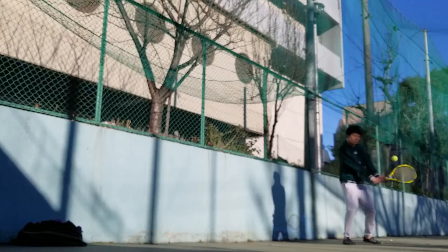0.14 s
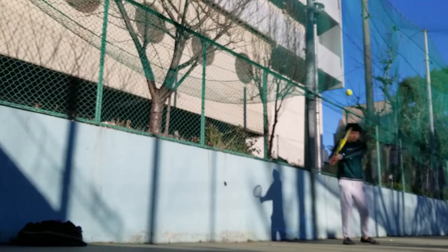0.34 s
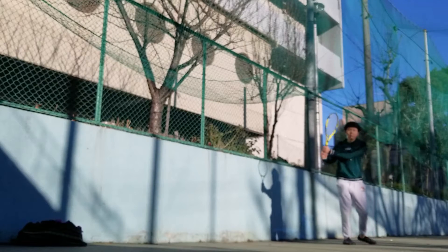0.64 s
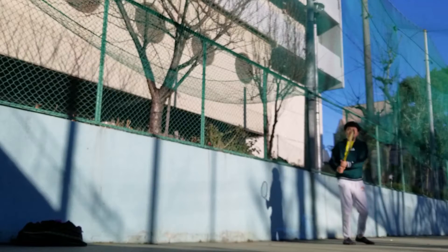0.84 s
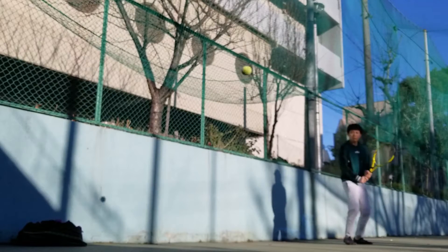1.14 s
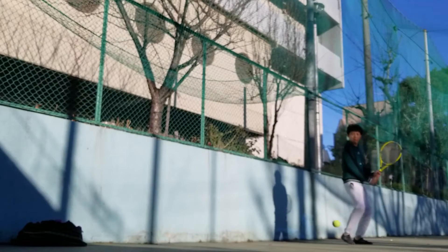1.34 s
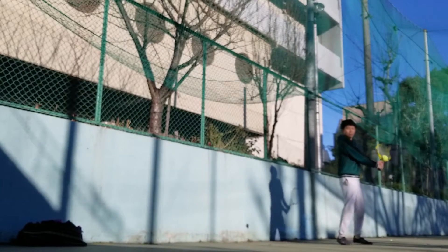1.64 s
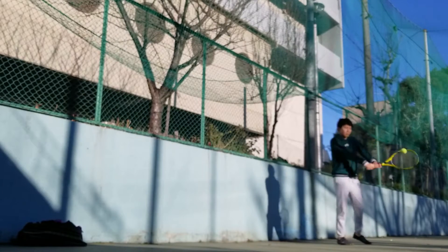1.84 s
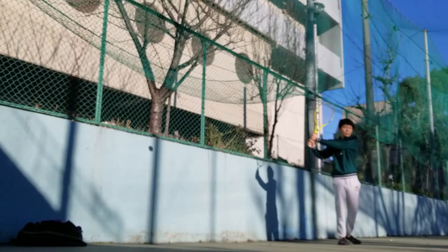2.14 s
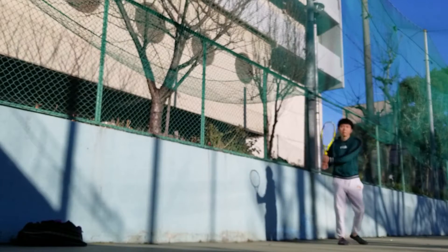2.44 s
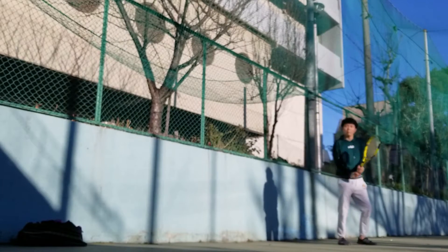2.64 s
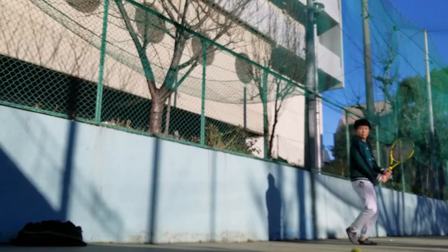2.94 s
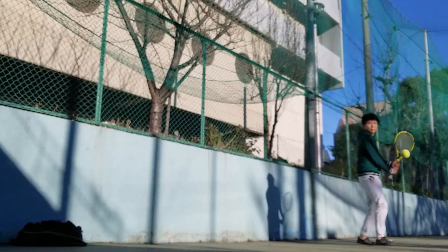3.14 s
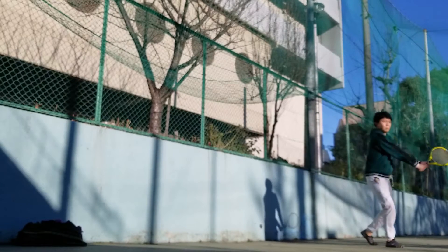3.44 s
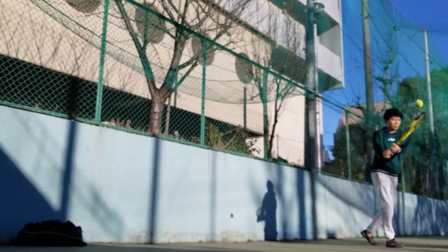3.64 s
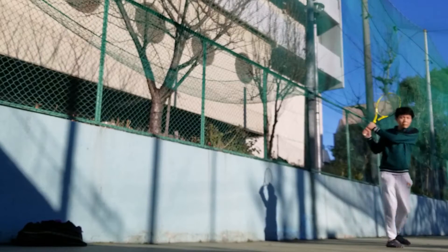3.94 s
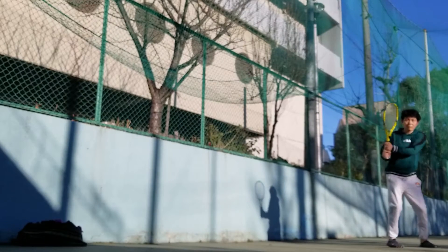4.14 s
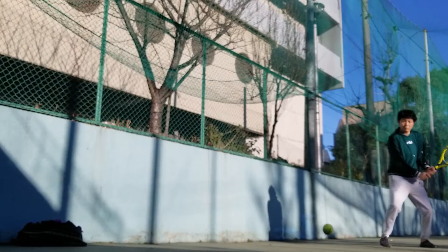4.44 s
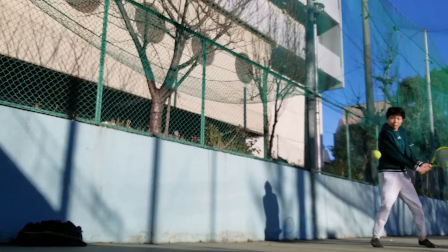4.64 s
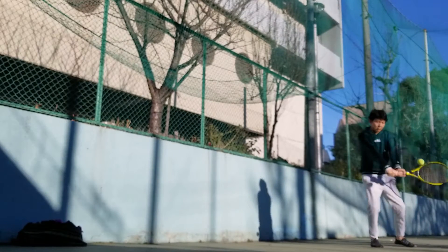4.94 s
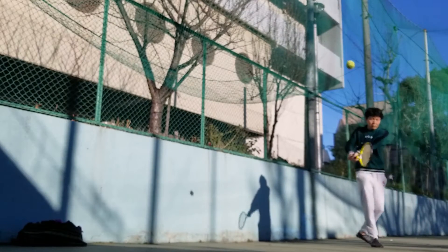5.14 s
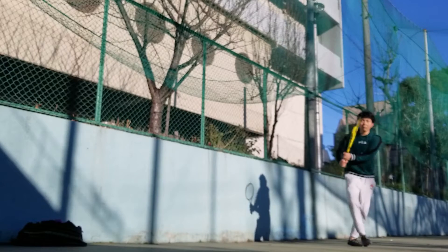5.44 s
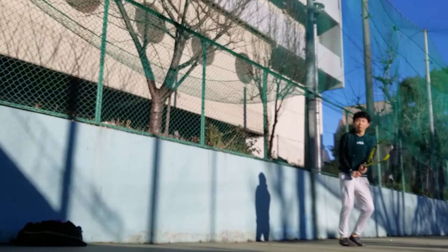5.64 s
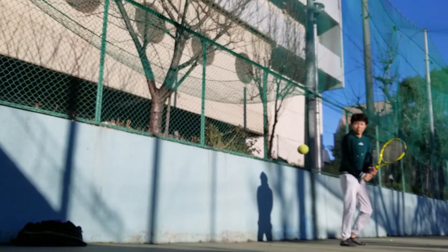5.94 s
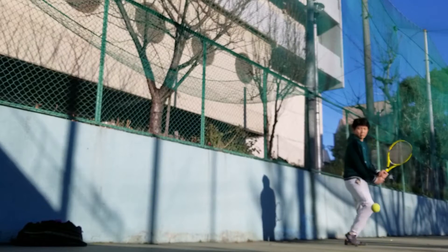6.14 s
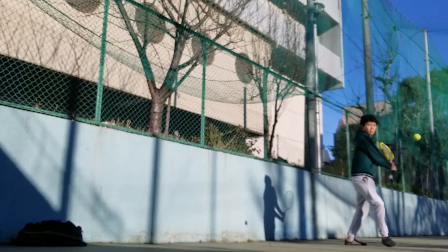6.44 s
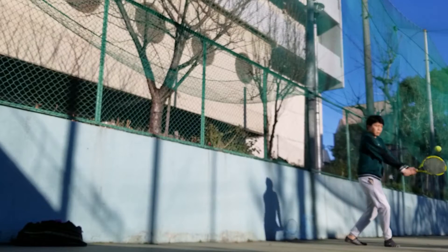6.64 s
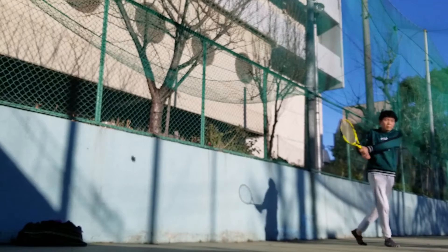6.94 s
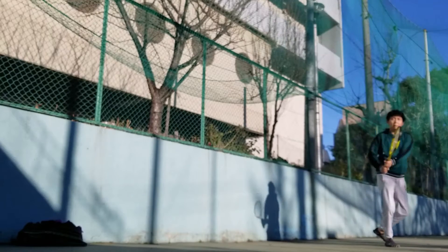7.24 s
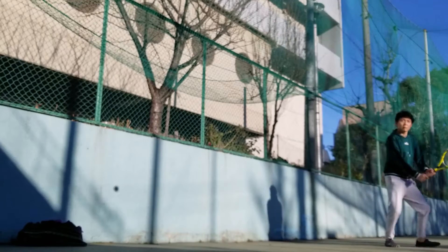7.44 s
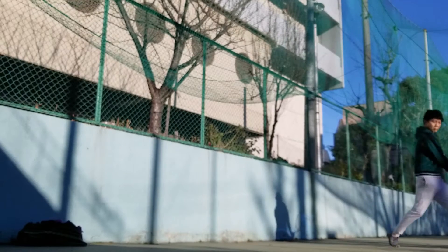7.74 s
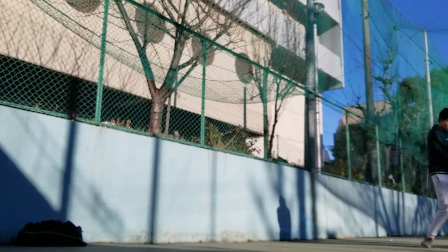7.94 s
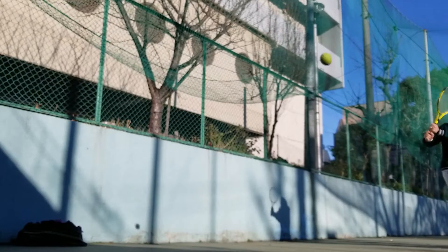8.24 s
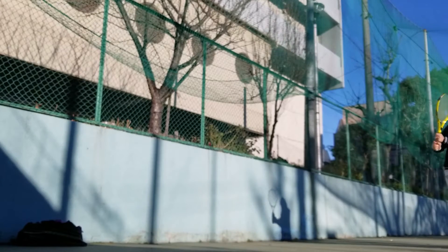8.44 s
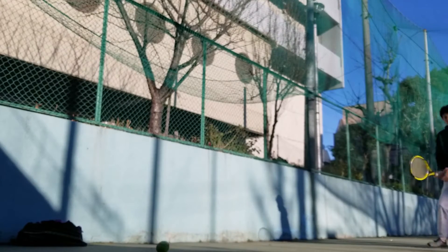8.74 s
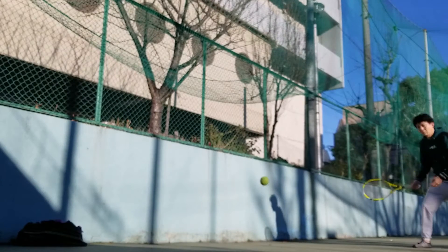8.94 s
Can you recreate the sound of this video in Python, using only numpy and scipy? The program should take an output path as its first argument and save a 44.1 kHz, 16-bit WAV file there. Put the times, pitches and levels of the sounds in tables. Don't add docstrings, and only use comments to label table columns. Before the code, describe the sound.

Outdoor wall practice: soft racket thwocks, loud cracking wall hits with short echoes, lighter court bounces, and shoe scuffs above a low town hum.

```python
import sys
import numpy as np
from scipy import signal
from scipy.fft import rfft, irfft, next_fast_len
from scipy.io import wavfile
from scipy.ndimage import uniform_filter1d

SR = 44100
rng = np.random.default_rng(int(sys.argv[2]) if len(sys.argv) > 2 else 0)


def digitize_waveform(pressure):
    field = np.atleast_2d(pressure).T
    bounded = np.clip(field, -1, 1)
    quanta = np.round(bounded * 32767).astype(np.int16)
    wavfile.write(sys.argv[1], SR, quanta)


def volts_from_db(level):
    exponent = np.asarray(level, float) / 20
    return 10 ** exponent


N = 399987
SPAN = 2 ** 15
T = np.arange(SPAN) / SR
HZ = np.fft.rfftfreq(SPAN, 1 / SR)

# t/s, level/dB
TRAFFIC = [(0.0, -46.5), (0.96, -42), (1.03, -44), (1.51, -44), (2.19, -46), (2.4, -44.5), (3.69, -46.5),
           (3.99, -43), (4.24, -46.5), (4.55, -45.5), (4.75, -49), (5.73, -46.5), (5.88, -46), (7.2, -45),
           (7.78, -45), (8.31, -43), (8.92, -45.5), (9.07, -43.5)]
# f/Hz, level/dB
RUMBLE = [(15, -70), (25, -33), (36, -17), (54, 4), (81, 0.5), (107, -0.5), (140, -18.5), (180, -43.5)]
HUM = [(82, -16), (140, 0), (205, -4), (269, -4), (603, -11), (750, -16.5), (980, -53.5), (1650, -120)]
TYRE_HISS = [(440, -41.5), (750, 12.5), (1400, 10.5), (2000, -2), (2650, -5.5), (3000, -23), (3800, -18.5),
             (5000, -61)]
# f/Hz, likeness (-1 to 1)
LIKENESS = [(60, 1), (130, 0.93), (290, 0.91), (640, 0.13), (1410, -0.44), (3100, 0.08), (15000, 0.027)]

# t/s, half length/ms, scuff level/dB, sizzle level/dB
DRAGS = [(.37, 69, -61, -66), (.55, 150, -78.5, -85), (.91, 84, -66, -79), (1.93, 65, -60.5, -66),
         (2.37, 90, -61.5, -62.5), (2.529, 51, -54.5, -60), (2.66, 61, -59.5, -82), (3.0, 23, -70, -77),
         (3.262, 13, -57.5, -79), (3.36, 65, -76, -99), (3.6, 24, -63, -70), (3.72, 77, -71.5, -102),
         (4.086, 23, -49.5, -52.5), (4.19, 77, -63, -84), (4.92, 35, -77, -81), (5.02, 13, -76, -76),
         (5.2, 60, -76, -100), (5.602, 22, -52.5, -62), (5.71, 37, -69, -91), (6.76, 27, -83, -80),
         (6.89, 24, -68, -98), (7.22, 30, -58.5, -65), (7.33, 42, -68, -98), (7.92, 64, -57.5, -59),
         (8.04, 15, -68, -72), (8.17, 56, -67.5, -98), (8.52, 30, -59.5, -72), (8.65, 59, -65, -86),
         (8.84, 28, -70, -75.5)]
# t/s, half length/ms, level/dB
RUSTLES = [(1.84, 22, -70), (2.88, 21, -81), (4.72, 30, -86.5), (4.88, 60, -76.5), (5.2, 50, -85),
           (5.95, 35, -84), (6.2, 15, -85), (6.57, 32, -82.5), (7.55, 29, -77), (7.65, 20, -82),
           (7.72, 15, -86), (8.95, 45, -86)]
STILL_DB = (-83, -101, -85)
# f/Hz, level/dB
SCUFF = [(1500, -35.5), (2500, -8), (4000, -11.5), (6000, -15.5), (8000, -23.5), (9500, -44)]
CLOTH = [(5500, -25.5), (6500, 7.5), (7300, 14), (8100, 11), (8900, -45)]
SIZZLE = [(8000, -12), (9500, -14.5), (11500, -6.5), (13700, -6), (15600, -7), (16000, -30)]
# t/s,
# level/dB, f/Hz, time to fall 60 dB/s
SHORT_TICKS = [(0.0594, -61, 1570, 0.01), (3.2565, -54, 4710, 0.014), (3.879, -45, 1600, 0.0091),
               (5.4086, -75, 1620, 0.012), (6.18, -55, 6600, 0.014), (6.4994, -73, 1520, 0.0073),
               (6.539, -61, 1680, 0.0075), (7.3178, -38.5, 2330, 0.009), (7.4994, -48, 1630, 0.01),
               (7.6194, -42, 1500, 0.01), (8.2594, -63, 1490, 0.01), (8.4494, -64, 1850, 0.012),
               (8.5694, -48, 2580, 0.0083), (8.6413, -51, 1660, 0.01), (8.6489, -32.5, 2350, 0.0091),
               (8.7326, -51, 1640, 0.0068), (8.8094, -50, 2080, 0.01), (8.844, -36.5, 1950, 0.017)]

# t/s, thump level/dB, string clack level/dB
STROKES = [
    (0.2215, -26.5, -33.5),
    (1.8798, -23, -39.5),
    (3.557, -21, -35),
    (4.9914, -34, -46),
    (6.7128, -23.5, -39.5),
    (8.0103, -25, -38),
]
# ring level/dB, then level/dB of four modes, lowest first
LANDINGS = [
    (-38.5, -8, 1, -5, -26),
    (-37, -23, -8, -26, -4),
    (-36, -4, -1, -26, 0),
    (-43, -6, -14, -24, -9),
    (-32.5, -20, -3, -28, -12),
    (-39.5, 0, -16, -18, -2),
]
# f/Hz, level/dB, time to fall 60 dB/s
CLACK_MODES = [(1089, 7.5, 0.038), (1213, -11, 0.042), (1314, -1.5, 0.12), (1427, 2, 0.06),
               (2290, -22, 0.36), (2480, -7, 0.091), (2760, -45.5, 0.54)]
# f/Hz, level/dB, time to fall 60 dB/s
STEADY_MODES = [(872, 0, .24), (1620, -17, .36)]
# f/Hz, time to fall 60 dB/s
PLACED_MODES = [(566, .42), (1455, .14), (1852, .3), (1989, .23)]
# f/Hz, level/dB
FELT = [(880, 2), (1500, -2.5), (2540, -12.5), (2970, -23.5), (4160, -19.5), (4690, -16.5), (7840, -21),
        (16000, -29)]

# t/s, left leads/ms, wall echo/ms, fence echo/ms
BOUNCE_PATHS = [(1.3796, -.16, 3.52, 11.1), (2.9427, -.16, 3.54, 14.4), (4.4036, -.11, 3.47, 14.5),
                (6.0719, -.18, 3.59, 13.1), (7.7984, -.29, 3.75, 14.5), (8.7529, .02, 2.95, 13.6)]
# crack level/dB, thump level/dB, ball air level/dB, fence echo level/dB
BOUNCE_LEVELS = [
    (-17.5, -30, -34.5, -8),
    (-15, -29, -37.5, -6),
    (-21, -30, -39.5, -3.5),
    (-22, -29.5, -39, -5),
    (-18, -30, -38, -7.5),
    (-20.5, -28.5, -39, -8.5),
]
# t/s, left leads/ms, fence echo/ms, far house front echo/ms
WALL_PATHS = [(.7842, .34, 14.3, 191), (2.4642, .34, 15.2, 192), (4.0261, .39, 16.2, 196),
              (5.5319, .34, 15.2, 193), (7.162, .2, 17.6, 193), (8.4803, .48, 16.1, 203)]
# crack, thump, ball air, grit and fence echo, each level/dB
WALL_LEVELS = [
    (-5, -7.5, -19.5, -31.5, -14),
    (-4, -8.5, -19.5, -16, -12),
    (-1, -4, -18, -21, -12),
    (-7, -9.5, -20, -36, -12),
    (-2, -4, -19, -21, -15),
    (1.5, -4.5, -20.5, -30, -9.5),
]
# f/Hz, level/dB, time to fall 60 dB/s
POST_MODES = [(4050, -10, .16), (4115, -5, .2), (4160, 0, .24), (4205, -5, .14), (6640, -12, .05),
              (8790, -16, .04)]

# echo after a wall hit/ms, echo after a court sound/ms, level/dB
BUILDINGS = [(72.4, 70.5, -21), (91, 80.5, -28), (97.5, 106, -24), (115, 122, -30), (145, 87, -33),
             (160, 152, -30), (171, 168, -30)]
# f/Hz, time to fall 60 dB/s
TAIL_DECAY = [(150, 1), (600, 0.094), (2000, 1), (3300, 0.71), (5000, 0.24), (12000, 0.19)]
# f/Hz, level/dB
TAIL_COLOUR = [(100, -16), (400, 6.5), (1500, -4), (4000, 2.5), (8000, 6.5), (16000, -30)]
# f/Hz, level/dB
BALANCE_DB = [(60, -0.5), (250, -2), (1000, -3), (2500, -4), (8000, -4), (14000, -2)]


def unit(x):
    return x / np.sqrt(np.mean(x ** 2) + 1e-20)


def along(points, hz):
    f, v = np.transpose(points)
    return np.interp(np.log(hz + 1), np.log(f + 1), v)


def curves(rows):
    s, *cols = np.transpose(rows)
    return [np.interp(np.arange(N) / SR, s, c) for c in cols]


def swells(rows, shape):
    t = np.arange(N) / SR
    return sum(volts_from_db(db) * np.exp(-np.abs((t - s) * 1000 / half_ms) ** shape / 2) for s, half_ms, db in rows)


def rush(spectrum, patchy_db):
    hz, _, z = signal.stft(rng.standard_normal((2, N + SR)), SR, nperseg=4096)
    turn = np.arccos(np.clip(along(LIKENESS, hz), -1, 1))[:, None] / 2
    low_end = [(spectrum[0][0] / 1.5, -120)]
    high_end = [(spectrum[-1][0] * 1.5, -120)]
    colour = volts_from_db(along(low_end + list(spectrum) + high_end, hz))[:, None]
    mid, side = signal.istft(z * colour * [np.cos(turn), np.sin(turn)], nperseg=4096)[1]
    z = signal.stft([mid + side, mid - side], nperseg=512)[2]
    patches = uniform_filter1d(rng.standard_normal(z.shape[1:]), size=8, axis=0)
    patches = uniform_filter1d(patches, size=8, axis=1)
    return unit(signal.istft(z * volts_from_db(patchy_db * unit(patches)), nperseg=512)[1][:, :N])


def bump(t, centre_ms, width_ms):
    return np.exp(-((t * 1000 - centre_ms) / width_ms) ** 2 / 2)


def ring(t, hz, t60):
    return (t > 0) * np.sin(2 * np.pi * hz * t) * volts_from_db(-60 * np.abs(t) / t60)


def path(ms, lead_ms, db):
    late = (ms + np.array([[0], [lead_ms]])) / 1000
    return volts_from_db(db) * np.exp(-2j * np.pi * HZ * late)


def surroundings(column, shift_ms, slap_db, front_ms, front_db, wet_db):
    slaps = sum(path(row[column] + shift_ms, -.3, row[2] + slap_db) for row in BUILDINGS)
    slaps = slaps / (1 + 1j * HZ / 9000)
    ribs = rng.normal(0, 1, (14, 3))
    front = sum(path(front_ms - 6 + 12 * abs(late), .15 * side, front_db + 4 * size)
                for late, side, size in ribs)
    front = front / (1 + 1j * .6 * (HZ / 1600 - 1600 / (HZ + 1))) ** 2
    hz, t, z = signal.stft(rng.standard_normal((2, SPAN)), SR, nperseg=256)
    fading = z * volts_from_db(-60 * t / along(TAIL_DECAY, hz)[:, None])
    tail = signal.istft(fading, nperseg=256)[1][:, :SPAN]
    tail = tail * (1 - .85 * bump(T, 50, 35)) * (T > .018) * (T < .68)
    flutter = unit(uniform_filter1d(rng.standard_normal(SPAN), size=60))
    tail = tail * volts_from_db(4 * flutter)
    tail = volts_from_db(wet_db) * tail / np.linalg.norm(tail[0])
    return slaps + front + rfft(tail) * volts_from_db(along(TAIL_COLOUR, HZ))


def add(out, s, sound, ways):
    part_sample = s * SR - round(s * SR)
    heard = irfft(rfft(sound) * ways * np.exp(-2j * np.pi * HZ * part_sample / SR), SPAN)
    first = round(s * SR) - round(.002 * SR)
    out[:, first:][:, :SPAN] += heard


def town():
    hum_db, hum_swing, hiss_db, hiss_swing = -47, 0.54, -56.5, 0.95
    strength_db, = curves(TRAFFIC)
    swing_db = strength_db - strength_db.mean()
    rumble = volts_from_db(strength_db + 2.5) * rush(RUMBLE, patchy_db=0.5)
    hum = volts_from_db(hum_db + hum_swing * swing_db) * rush(HUM, patchy_db=2.07)
    hiss = volts_from_db(hiss_db + hiss_swing * swing_db) * rush(TYRE_HISS, patchy_db=2.9)
    return rumble + hum + hiss


def wash():
    late_ms, half_ms, wall_db, stroke_db, body_db = 204, 100, -51, -32.5, 4
    hits = [(where[0], level[1] + wall_db) for where, level in zip(WALL_PATHS, WALL_LEVELS)]
    hits += [(row[0], row[1] + stroke_db) for row in STROKES]
    swell = swells([(s + late_ms / 1000, half_ms, db) for s, db in hits], shape=1.4)
    return swell * (rush(TYRE_HISS, patchy_db=2.5) + volts_from_db(body_db) * rush(HUM, patchy_db=2.5))


def player():
    held = 2.37
    scuff = volts_from_db(STILL_DB[0]) + swells([(s, half, db) for s, half, db, _ in DRAGS], held)
    sizzle = volts_from_db(STILL_DB[2]) + swells([(s, half, db) for s, half, _, db in DRAGS], held)
    cloth = volts_from_db(STILL_DB[1]) + swells(RUSTLES, held)
    cloth = cloth * rush(CLOTH, patchy_db=1.5)
    return scuff * rush(SCUFF, patchy_db=3.5) + sizzle * rush(SIZZLE, patchy_db=2.5) + cloth


def ticks(out):
    for s, db, hz, t60 in SHORT_TICKS:
        fall = max(t60, .002)
        puff = rng.standard_normal(SPAN) * (T > .002) * volts_from_db(-60 * (T - .002) / fall)
        around_pitch = 1 / (1 + 1j * 5.2 * (HZ / hz - hz / (HZ + 1)))
        add(out, s, volts_from_db(db + 8.0) * puff, path(0.83, -.3, 0) * around_pitch)
    return out


def racket(out):
    fizz_db, fizz_grows = -23, 0.35
    t = T - .002
    for (s, thump_db, clack_db), (ring_db, *landing) in zip(STROKES, LANDINGS):
        thump = np.sin(2 * np.pi * 290 * t) * bump(t, 1.75, 1.43)
        thump += 1.1 * bump(t, 4.6, .2) - .5 * bump(t, 4.1, .2)
        long = STEADY_MODES + [(hz, db, t60) for (hz, t60), db in zip(PLACED_MODES, landing)]
        modes = [(hz, db + clack_db, t60) for hz, db, t60 in CLACK_MODES]
        modes += [(hz, db + ring_db, t60) for hz, db, t60 in long]
        strings = sum(volts_from_db(db + rng.normal(0, 1.2)) * ring(t - rng.uniform(.002, .007), hz, t60)
                      for hz, db, t60 in modes)
        strings = strings * (1 - .8 * bump(t, 0, 6))
        felt = unit(irfft(rfft(rng.standard_normal(SPAN)) * volts_from_db(along(FELT, HZ)), SPAN))
        fade = volts_from_db(-60 * t / 0.078) + 0.14 * volts_from_db(-60 * t / 0.56)
        fizz = felt * (t > 0) * (1 - bump(t, 0, 0.097)) * fade
        sound = volts_from_db(thump_db) * thump + volts_from_db(fizz_db + fizz_grows * thump_db) * fizz
        near = path(0.23, -0.278, 0) + path(3.0, 0.381, -1.1) + path(17.0, 0.93, -20.5)
        far = surroundings(column=1, shift_ms=7, slap_db=0, front_ms=174, front_db=-25, wet_db=-10)
        add(out, s, sound, near + far)
        add(out, s, strings, path(.3, .08, 2) + path(13.5, .1, -12) + .1 * far)
    return out


def ball(crack_db, thump_db, cavity_db, spit_db, snap_ms, thump_hz, cavity_hz, early, free, rebound):
    t = T - round(.002 * SR) / SR
    snap = (1 + np.tanh((t * 1000 - .05) / snap_ms)) / 2
    crack = -bump(t, 0.086, 0.14) * (1 - snap) * 0.98
    crack += rebound * snap * bump(t, 0.21, 0.12)
    spit = bump(t, 0, 0.12) * uniform_filter1d(rng.standard_normal(SPAN), size=3)
    turn = 2 * np.pi * thump_hz * (t - .0004)
    squash = bump(t, 2.42, 1.04) * (1 - bump(np.maximum(t, 0), 0, 0.036))
    thump = (np.sin(turn) - 0.41 * np.cos(2 * turn)) * squash
    thump += 0.19 * ring(t - .0038, thump_hz / 2, 0.016) + 0.032 * ring(t, thump_hz / 2, 0.11)
    cavity = early * ring(t - .00005, cavity_hz, .008)
    cavity += free * ring(t - .0042, .97 * cavity_hz, .05) * bump(t, 5.2, 1.5)
    return volts_from_db(crack_db) * crack + volts_from_db(spit_db) * spit + volts_from_db(thump_db) * thump + volts_from_db(cavity_db) * cavity


def bounce(out):
    for (s, lead, side, echo), levels in zip(BOUNCE_PATHS, BOUNCE_LEVELS):
        crack_db, thump_db, cavity_db, echo_db = levels
        sound = ball(crack_db, thump_db, cavity_db + 11, crack_db - 22, snap_ms=.05, thump_hz=300,
                     cavity_hz=960, early=1, free=.15, rebound=.4)
        near = path(-lead, lead, 0) + path(side - .44, .44, -0.81)
        fence = path(echo - .3, .3, echo_db) + path(echo + 1.3, .45, echo_db)
        near += fence / (1 + 1j * HZ / 6000)
        far = surroundings(column=1, shift_ms=rng.normal(0, 1.5), slap_db=1, front_ms=184,
                           front_db=-28, wet_db=-13)
        add(out, s, sound, near + far)
    return out


def wall(out):
    post_db, post_db_per_ms = -56, 22
    for (s, lead, echo, front), levels in zip(WALL_PATHS, WALL_LEVELS):
        crack_db, thump_db, cavity_db, grit_db, echo_db = levels
        gap = 1.29 - 1.5 * lead
        sound = ball(crack_db, thump_db, cavity_db, grit_db, rebound=0, snap_ms=.055, thump_hz=270,
                     cavity_hz=1170, early=2.4, free=.75)
        near = path(0, lead, 0.032) + path(gap, lead - .08, -0.52) + path(echo, 0.33, echo_db)
        near += path(echo + .5, .4, echo_db) / (1 + 1j * HZ / 900)
        far = surroundings(column=0, shift_ms=0.21 * (front - 194), slap_db=2.0, front_ms=front,
                           front_db=-32.5, wet_db=-21.5)
        add(out, s, sound, near + far)
        post = sum(volts_from_db(db) * ring(T - .004, hz + rng.normal(0, 12), t60 * rng.uniform(.9, 1.4))
                   for hz, db, t60 in POST_MODES)
        post = post * (1 - 0.54 * bump(T, 2.0, 2.2))
        add(out, s, volts_from_db(post_db + post_db_per_ms * lead) * post, path(0, .09, -1))
    return out


def scene():
    background = town() + wash() + player()
    contacts = sum(source(np.zeros((2, N + SPAN))) for source in (ticks, racket, bounce, wall))
    return background + contacts[:, :N]


def band_limit(x):
    return signal.sosfilt(signal.butter(12, 16810, fs=SR, output="sos"), x)


def record(dry):
    size = next_fast_len(N + 4096)
    hz = np.fft.rfftfreq(size, 1 / SR)
    ports = volts_from_db(along(BALANCE_DB, hz) / 2 * [[1], [-1]]) * (hz < 16250)
    ports = ports * (1 + .8 / (1 + 5j * (hz / 7500 - 7500 / (hz + 1))))
    heard = irfft(rfft(dry, size) * ports, size)[:, :N]
    heard = heard / (1 + np.abs(heard / 1.05) ** 6) ** (1 / 6)
    return band_limit(heard)


dry = scene()
out = record(dry)
digitize_waveform(out)
```